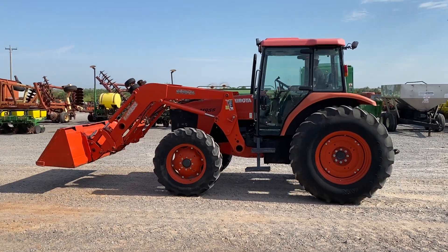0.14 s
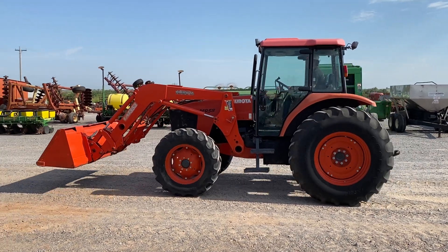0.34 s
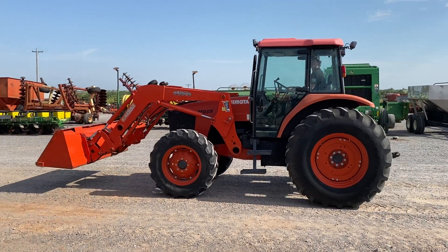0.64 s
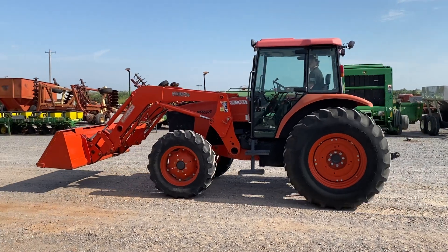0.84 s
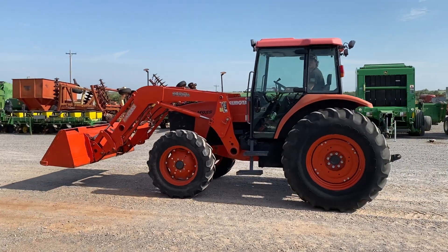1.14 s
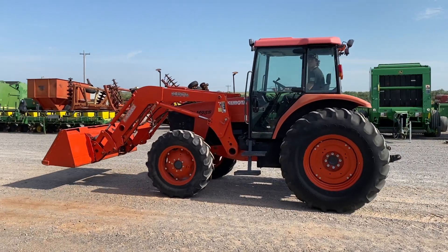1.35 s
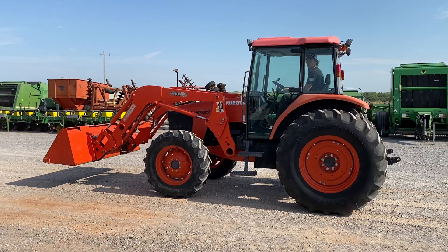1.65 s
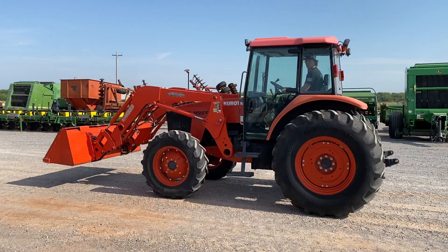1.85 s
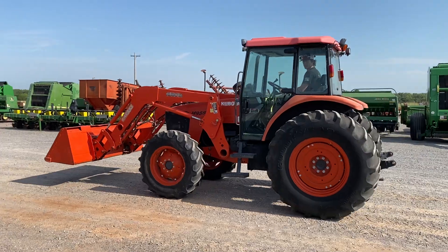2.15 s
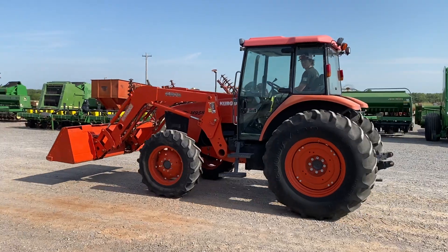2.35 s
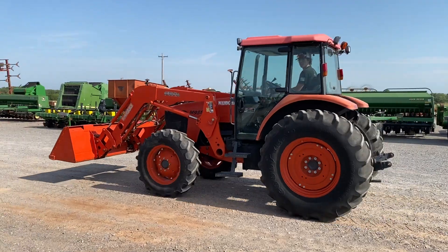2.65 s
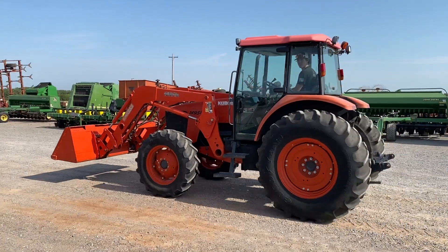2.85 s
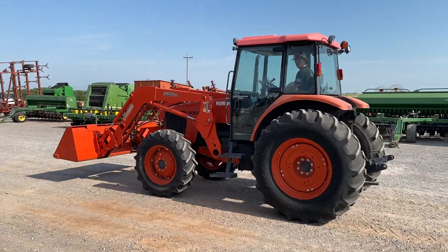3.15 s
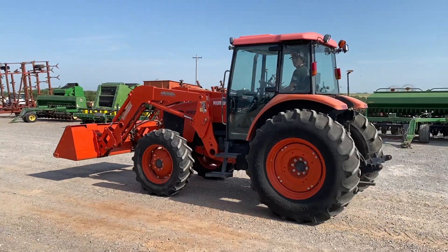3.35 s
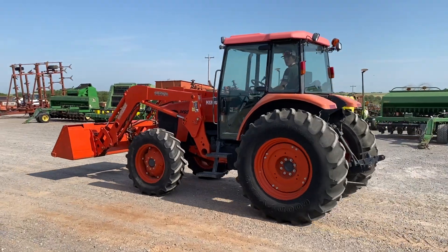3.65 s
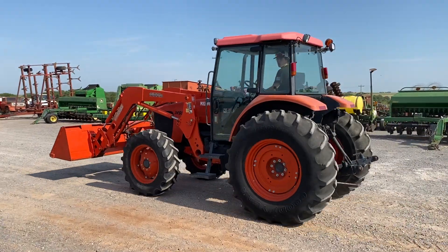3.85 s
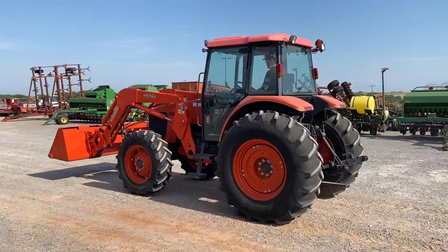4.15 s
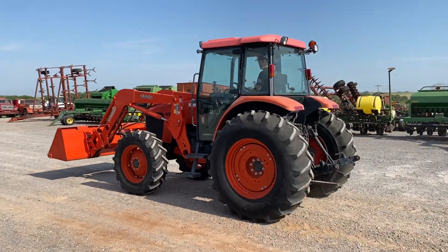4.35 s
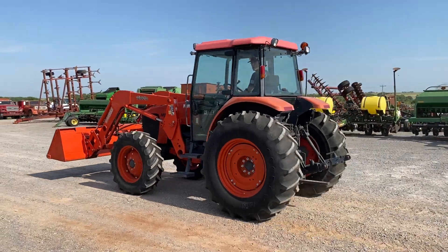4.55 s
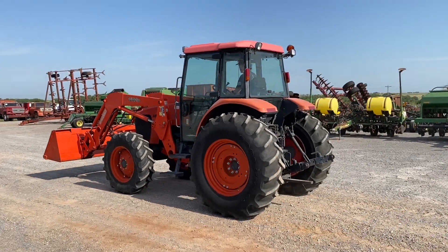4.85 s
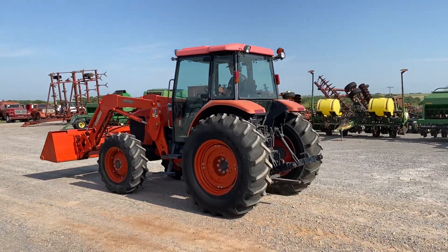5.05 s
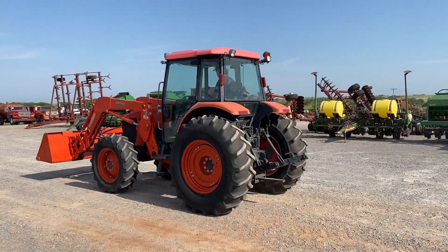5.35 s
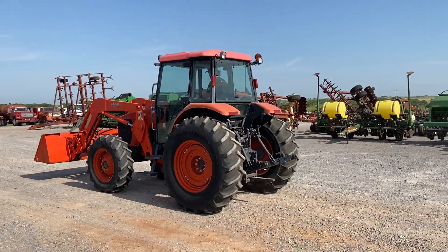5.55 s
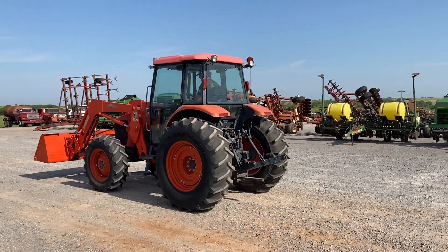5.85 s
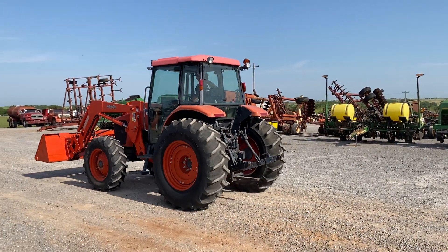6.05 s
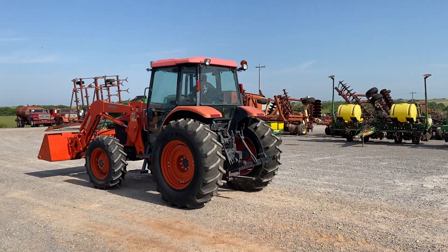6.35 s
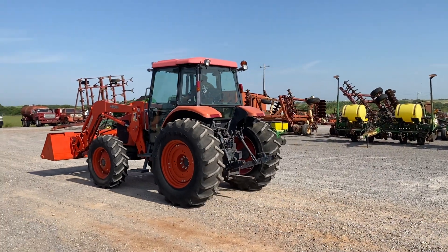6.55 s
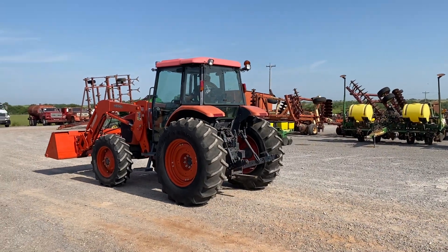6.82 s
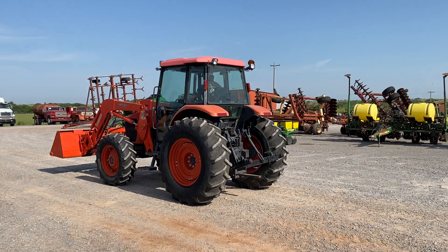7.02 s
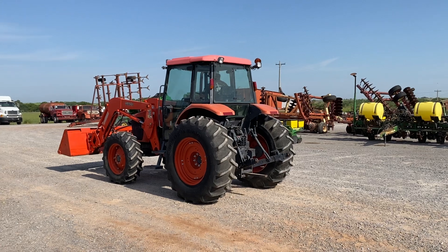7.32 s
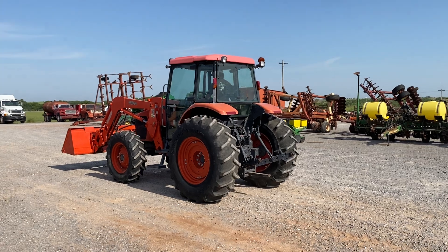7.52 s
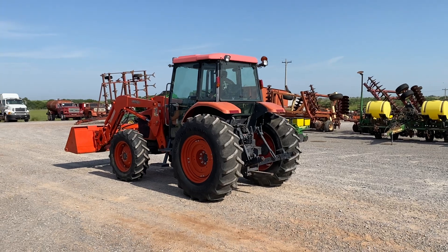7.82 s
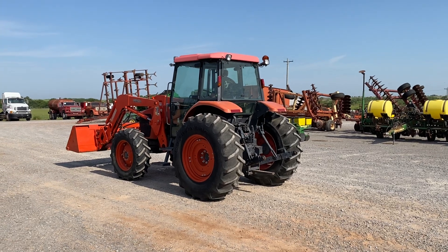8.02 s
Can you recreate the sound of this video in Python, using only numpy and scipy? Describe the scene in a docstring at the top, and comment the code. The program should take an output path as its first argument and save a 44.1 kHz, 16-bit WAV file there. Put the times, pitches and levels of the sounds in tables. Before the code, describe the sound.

A diesel tractor runs close by in an open yard, with a low pulsing exhaust, dense knocking, light ticks and a thin, fluttering gear whine. Gusty wind rumbles on the hand-held microphone, thumping at the very start and again between about 1.5 and 3 seconds. The engine knocks harder in the first half second, rises slightly in speed from 1 to 2.5 seconds, then holds steady. Scattered stones snap under the creeping tyres, with a cluster of knocks and a clank near 5.7 seconds. From about 5.3 to 6 seconds the engine slows to a lower beat and then grows quieter as it draws away. Around 6.6 seconds the steel linkage rattles briefly with a hollow clunk. Strong wind thumps and pops follow from 6.7 to 7.5 seconds, then the wind eases and the softer engine continues until about 8 seconds.

```python
"""A gravel yard in gusty wind, where a diesel tractor creeps away from two hand-held microphone ports.
Each firing drives a pulse from the exhaust and shakes the casing, so exhaust beats, combustion knock,
valve ticks and gear whine all follow the engine speed, which drops near the end. Stones snap under
the tyres amid low knocks and a clank, the steel linkage rattles once, and turbulent air buffets the
ports with thumps and pops."""
import sys
import numpy as np
from scipy import signal
from scipy.fft import rfft, irfft, next_fast_len
from scipy.io import wavfile

SR = 44100
rng = np.random.default_rng(int(sys.argv[2]) if len(sys.argv) > 2 else 0)


def master_out(mix):
    """Clip the mix to full scale and print it as 16-bit PCM to the path in sys.argv[1]."""
    frames = np.transpose(np.atleast_2d(mix))
    ceiling = np.clip(frames, -1, 1)
    pcm = np.round(ceiling * 32767).astype(np.int16)
    wavfile.write(sys.argv[1], SR, pcm)


N = 360738
T = np.arange(N) / SR
HZ = np.fft.rfftfreq(N, 1 / SR)

# combustion knock as the tractor turns and draws away: (time [s], level [dB])
KNOCK_LEVEL = [(0, -29), (.8, -26.5), (2.4, -25), (3.5, -27), (4.2, -26), (5.2, -27), (5.6, -29.5),
               (6.0, -30.5), (6.7, -29.5), (7.3, -32), (7.8, -34.5), (8.18, -32.5)]


def gain_of(db):
    """Amplitude ratio of a level in decibels."""
    return 10 ** (np.asarray(db) / 20)


def unit_rms(x):
    """Normalisation to a root-mean-square value of 1."""
    return x / np.sqrt(np.mean(x ** 2) + 1e-20)


def spectrum(points, hz=HZ):
    """Interpolation of a (frequency, value) table on a logarithmic frequency axis."""
    f, value = np.transpose(points)
    return np.interp(np.log(hz + 1), np.log(f + 1), value)


def curves(rows):
    """Linear interpolation in time: one curve for each column after the first."""
    times, *columns = np.transpose(rows)
    return [np.interp(T, times, column) for column in columns]


def coloured(x, points):
    """Spectral shaping by a (frequency, level) table, normalised to rms 1."""
    return unit_rms(irfft(rfft(x) * gain_of(spectrum(points)), N))


def resonance(hz, width_hz):
    """Lorentzian peak of a damped resonator, of height 1."""
    return 1 / (1 + (2 * (HZ - hz) / width_hz) ** 2)


def mode(t, hz, db, t60):
    """Free vibration of a damped mode: a sinusoid that falls 60 dB in t60 seconds."""
    return gain_of(db - 60 * t / t60) * np.sin(2 * np.pi * hz * t)


def wander(rate_hz):
    """Slow random modulation: low-pass noise of rms 1."""
    hop = 64
    steps = next_fast_len(N // hop + 2)
    hz = np.fft.rfftfreq(steps, hop / SR)
    slow = irfft(rfft(rng.standard_normal(steps)) / (1 + (hz / rate_hz) ** 4), steps)
    return np.interp(np.arange(N) / hop, np.arange(steps), unit_rms(slow))


def firings():
    """Phase is the integral of frequency: the running count of firings."""
    # engine speed: (time [s], firing rate [Hz])
    speed = [(0, 36.7), (.75, 36.8), (1.45, 37.55), (2.5, 39.1), (2.85, 39.25), (3.2, 39.1), (4.9, 39.1),
             (5.31, 38.8), (5.47, 37.4), (5.6, 35.3), (5.75, 33.4), (5.89, 31.6), (5.98, 30.8), (6.1, 30.8),
             (6.2, 31.5), (6.3, 31.6), (6.65, 32.2), (7.35, 32.1), (8.18, 32.5)]
    return 0.082 + np.cumsum(curves(speed)[0]) / SR


def per_firing(spread_db, pattern_db):
    """Cyclic variation: each firing's strength is a repeating cylinder pattern plus chance."""
    count = firings().astype(int)
    chance = np.clip(rng.standard_normal(count[-1] + 1), -1.7, 1.7)
    return gain_of(spread_db * chance[count] + np.array(pattern_db)[count % len(pattern_db)])


def firing_decay(decay, lag=0):
    """Exponential decay restarted once a firing; decay and lag are in firing periods."""
    return np.exp(-((firings() - lag) % 1) / decay)


def harmonic(order, jitter_cycles, jitter_hz):
    """Phase modulation: a multiple of the firing rate that wavers at random, rms 1."""
    cycles = order * firings() + rng.random() + jitter_cycles * wander(jitter_hz)
    return np.sqrt(2) * np.sin(2 * np.pi * cycles)


def following_knock(db, slope):
    """Power-law gain: db when the knock is at -26 dB, moving by slope dB per dB of knock."""
    return gain_of(db + slope * (curves(KNOCK_LEVEL)[0] + 26))


def wind():
    """Turbulent pressure at the ports: a lumpy rumble out of which duller gusts rise and fade."""
    # steady flow: (time [s], level [dB], brightness [0-1])
    flow = [(0, -19.5, 0.24), (.5, -20, 0.25), (1.2, -20.5, 0.34), (1.7, -16.5, 0.17), (1.95, -16, 0.33),
            (2.15, -16, 0.41), (2.5, -17.5, 0.24), (2.9, -16.5, 0.24), (3.2, -19, 0.41), (3.8, -22, 0.24),
            (4.0, -19.5, .6), (4.35, -24, 0.6), (4.7, -22, 0.52), (5.3, -18.5, 0.5), (5.8, -23, 0.45),
            (6.5, -21, 0.56), (6.7, -15.5, 1), (6.95, -18.5, 0.47), (7.03, -23.5, 0.58), (7.12, -23, 0.8),
            (7.2, -16, 0.37), (7.3, -22, 0.16), (7.4, -19, 0.56), (7.49, -21.5, 0.74), (7.56, -29, 0.25),
            (7.8, -37.5, 0.14), (8.18, -28.5, 0.6)]
    # gusts thumping the ports: (peak time [s], level [dB], decay time [s])
    thumps = [(0.087, -3.5, 0.0078), (.13, -5, 0.036), (0.339, -16, 0.0096), (.43, -15, 0.037),
              (.7, -13, 0.055), (.93, -22, .03), (1.36, -13, 0.018), (1.43, -24, 0.015), (1.5, -12, 0.015),
              (1.82, -9, 0.031), (1.93, -22, 0.026), (2.03, -11, 0.03), (2.16, -14.5, 0.039),
              (2.28, -8, 0.054), (2.39, -5, 0.016), (2.69, -14, 0.037), (2.78, -12, 0.058),
              (2.94, -15.5, 0.033), (3.05, -19, 0.016), (4.9, -17, 0.023), (5.42, -13, 0.02),
              (6.29, -26, 0.041), (6.63, -18, 0.042), (6.72, -28, 0.041), (6.84, -20, 0.015),
              (6.979, -13.5, 0.012), (7.045, -8.5, 0.064), (7.09, -12, 0.018), (7.13, -10, 0.014),
              (7.399, -8.5, 0.023), (7.47, -13, 0.024), (7.77, -26, 0.023), (8.08, -24, .03),
              (8.16, -25, .03)]
    # turbulence at brightness 0: (frequency [Hz], relative level [dB])
    dull_spectrum = [(20, -38), (35, -13.5), (55, 5), (100, 0), (200, -11.5), (400, -54), (900, -55),
                     (2000, -85)]
    # turbulence at brightness 1: (frequency [Hz], relative level [dB])
    bright_spectrum = [(20, -46), (35, -4), (70, -4.5), (130, -7.5), (250, -6.5), (450, -11), (900, -37),
                       (2000, -65)]
    rise_s, gust_brightness = 0.015, 0.63
    flow_db, bright = curves(flow)
    gusts = np.zeros(N)
    for peak_s, db, decay_s in thumps:
        near = slice(max(round((peak_s - .1) * SR), 0), round((peak_s + .5) * SR))
        t = T[near] - peak_s
        gusts[near] += gain_of(db) * np.where(t < 0, np.exp(-(t / rise_s) ** 2), np.exp(-t / decay_s))
    steady = gain_of(flow_db + 3 * wander(rate_hz=13.8))
    bright = np.clip(bright * (steady + gust_brightness * gusts) / (steady + gusts), 0, 1)
    air = rng.standard_normal((2, N))
    turbulence = (1 - bright) * coloured(air, dull_spectrum) + bright * coloured(air, bright_spectrum)
    return np.hypot(steady, gusts) * turbulence


def eddy_pops():
    """An eddy bursting at a port is a pressure transient: a few damped cycles that sink in pitch."""
    # (time [s], level [dB], approximate starting frequency [Hz], final frequency [Hz], t60 [s])
    eddies = [(0.07, -4, 487, 76, 0.1), (1.483, -8, 300, 80, 0.24), (2.361, -6, 383, 69.4, 0.38),
              (6.719, -9.5, 475, 121, 0.18), (7.043, -7, 300, 99, 0.11), (7.126, -2, 437, 118, 0.093),
              (7.2104, 1, 660, 70.4, 0.11), (7.384, -11, 770, 79.4, 0.097), (7.776, -21, 151, 81, 0.042)]
    out, t = np.zeros(N + SR), np.arange(SR // 4) / SR
    attack = 1 - np.exp(-t / 0.0011)
    for start_s, db, first_hz, last_hz, t60 in eddies:
        cycles = (first_hz - last_hz) * 0.00439 * (1 - np.exp(-t / 0.0042)) + last_hz * t
        at = round(start_s * SR)
        out[at:at + len(t)] += gain_of(db - 60 * t / t60) * np.sin(2 * np.pi * cycles) * attack
    return out[:N]


def gravel_and_knocks():
    """Impact transients: stone snaps, low knocks and a clank ring briefly over crackling gravel."""
    # stone snaps, low knocks and a clank:
    # (time [s], crack level [dB], ring level [dB], ring frequency [Hz])
    impacts = [(0.221, -26, -25, 869), (0.5138, -26, -15, 820), (1.5743, -33, -33, 818),
               (1.9174, -36, -15, 905), (2.044, -39, -19, 676), (2.2327, -33, -30, 636),
               (2.638, -28, -19, 1600), (2.673, -39, -18, 2170), (3.2264, -22.5, -20, 776),
               (3.991, -35, -16.5, 633), (4.0509, -26, -12, 846), (4.7727, -23.5, -25, 970),
               (5.2294, -32, -12, 900), (5.324, -28, -26, 716), (5.3968, -30, -42, 657),
               (5.6495, -36, -16, 880), (5.6515, -23, -24, 1490), (5.659, -34, -24, 1710),
               (5.666, -36, -29, 1500), (5.678, -40, -34, 1300), (5.7048, -29, -17, 830),
               (5.7125, -34, -32, 900), (5.727, -34, -24, 860), (6.4855, -25, -32, 974),
               (6.5974, -43, -10.5, 700), (6.704, -38, -32, 3820), (6.826, -27.5, -19, 900),
               (6.85, -36, -16, 960), (6.993, -31, -38, 676)]
    # a crack: (frequency [Hz], relative level [dB])
    snap_spectrum = [(200, -26), (600, -5), (1500, 0), (2500, 0), (4200, -3), (6000, -10), (8000, -19),
                     (16000, -32)]
    small_per_s, small_decay_s, crack_t60 = 25, 0.0095, 0.012
    noise = coloured(rng.standard_normal((2, N)), snap_spectrum)
    small = rng.random(N) < small_per_s / SR  # small stones under the tyres
    small_db = curves(KNOCK_LEVEL)[0] - 21 + 3 * np.minimum(rng.exponential(1, N), 3)
    pole = np.exp(-1 / (small_decay_s * SR))
    out = signal.lfilter([1], [1, -pole], small * gain_of(small_db)) * noise
    t = np.arange(SR // 10) / SR
    click_gain = gain_of(spectrum(snap_spectrum, np.fft.rfftfreq(len(t), 1 / SR)))
    click = np.roll(irfft(click_gain, len(t)), 40)
    click /= click.max()
    for start_s, crack_db, ring_db, hz in impacts:
        at = slice(round(start_s * SR), round(start_s * SR) + len(t))
        crack = noise[:, at]
        onset_rms = np.sqrt(np.mean(crack[:, :SR // 500] ** 2))
        out[:, at] += gain_of(crack_db - 60 * t / crack_t60) * crack / onset_rms
        out[0, at] += gain_of(crack_db + 10) * click
        out[0, at] += np.sqrt(2) * mode(t, hz, ring_db, t60=.024)
    return out


def linkage_rattle():
    """Impact excitation: loose steel parts collide in one flurry and ring in their modes."""
    # the flurry: (time [s], relative level [dB])
    flurry = [(6.45, -39), (6.588, -27), (6.596, -20), (6.64, -22), (6.7, -26), (6.77, -28.5), (6.81, -29),
              (6.854, -26), (6.874, -39), (6.934, -33), (6.99, -54)]
    # modes of the linkage: (frequency [Hz], relative level [dB], t60 [s])
    modes = [(300, -5, 0.11), (486, -6, 0.21), (586, -13, .08), (810, -17, 0.086), (1040, 2, 0.02),
             (1580, -9, 0.038), (1840, -9, 0.043), (2450, -12, 0.046)]
    # contact noise: (frequency [Hz], relative level [dB])
    clatter_spectrum = [(200, -19), (500, 4), (1500, -1), (2800, -8), (5000, -17), (8000, -31),
                        (16000, -45)]
    blows_per_s = 1500
    active = (T > flurry[0][0]) & (T < flurry[-1][0])
    blows = (rng.random((2, N)) < blows_per_s / SR) * rng.standard_normal((2, N)) * active
    t = np.arange(SR // 5) / SR
    response = sum(mode(t, hz, db, t60) for hz, db, t60 in modes)
    ringing = unit_rms(signal.oaconvolve(blows, response[None])[:, :N])
    clatter = coloured(blows, clatter_spectrum)
    duty_gain = np.sqrt(active.mean())  # refers the rms to the flurry's own length
    return gain_of(curves(flurry)[0]) * duty_gain * (0.78 * ringing + 0.98 * clatter)


def clunk():
    """Resonance of a hollow part struck during the rattle: one low mode swells and decays."""
    start_s, rise_s = 6.606, 0.0051
    t = np.maximum(T - start_s, 0)
    return (1 - np.exp(-t / rise_s)) * mode(t, hz=285, db=-9, t60=.3)


def bodywork():
    """Narrow resonances of the bodywork hum, clearest once the tractor has turned away."""
    # (frequency [Hz], bandwidth [Hz], relative level [dB])
    resonances = [(950, 22, 0), (1450, 30, -5), (2300, 70, -9)]
    # their joint hum: (time [s], level [dB])
    level = [(0, -50), (5.5, -50), (6.9, -46), (7.3, -43), (7.6, -45), (8.18, -47)]
    response = sum(gain_of(db) * resonance(hz, width) for hz, width, db in resonances)
    envelope = gain_of(curves(level)[0] + 2.2 * wander(10))
    return envelope * unit_rms(irfft(rfft(rng.standard_normal(N)) * response, N))


def metallic_hums():
    """Gears and valve train sound engine harmonics that flutter in amplitude and phase."""
    # (time [s], level of harmonic 20 [dB], of harmonic 25 [dB], of harmonic 37 [dB])
    levels = [(0, -42, -47, -46), (.8, -44, -47, -50), (1.3, -54, -52, -56), (2.5, -56, -52, -48),
              (3.6, -56, -54, -48), (5.2, -58, -56, -54), (8.18, -62, -62, -64)]
    return sum(gain_of(db + 4.5 * wander(14)) * harmonic(order, jitter_cycles=.16, jitter_hz=14)
               for order, db in zip((20, 25, 37), curves(levels)))


def gear_whine():
    """Tooth meshing makes a fluttering tone, jolted in phase and amplitude by each firing."""
    # the mesh tone: (time [s], level [dB])
    level = [(0, -55), (.55, -47), (.72, -40), (1.0, -44), (2.0, -43), (2.4, -48), (2.7, -42), (3.18, -50),
             (3.32, -40), (3.5, -48), (4.2, -46), (4.64, -56), (4.72, -40), (5.15, -40), (5.25, -50),
             (5.42, -56), (5.47, -38), (5.58, -46), (5.7, -56), (5.76, -42), (5.9, -43.5), (6.0, -54),
             (6.12, -49), (6.18, -44), (6.3, -45), (6.4, -53), (7.2, -55), (7.35, -45), (7.55, -46),
             (7.65, -48), (7.85, -47), (7.95, -51), (8.18, -55)]
    teeth_per_firing = 54
    firing_angle = 2 * np.pi * firings()
    cycles = teeth_per_firing * firings() + .09 * np.sin(firing_angle) + .11 * wander(28)
    envelope = gain_of(curves(level)[0] + 3 * wander(30) + 3 * np.cos(firing_angle))
    return envelope * np.sqrt(2) * np.sin(2 * np.pi * cycles)


def valve_ticks():
    """Brief impacts radiate treble: valves and injectors tick twice a firing over a thin hiss."""
    # the ticking: (time [s], level [dB])
    level = [(0, -48.5), (.7, -49.5), (1.9, -57.5), (2.8, -53.5), (4.2, -54), (5.4, -51.5), (6.0, -55),
             (7.2, -65), (8.18, -57)]
    # a tick: (frequency [Hz], relative level [dB])
    tick_spectrum = [(3000, -6), (5000, 2), (7000, -1.5), (9000, -7), (12000, -6.5), (16000, -11.5)]
    strong = 2.2 * per_firing(2.5, [0, 1, -1, 0]) * firing_decay(.1)
    weak = 0.55 * per_firing(5, [0]) * firing_decay(.16, lag=-.33)
    drive = (.5 + strong + weak) * rng.standard_normal((2, N)) * gain_of(1.2 * wander(12))
    return gain_of(curves(level)[0]) * coloured(drive, tick_spectrum)


def shadowing():
    """Acoustic shadow: the block fades behind the cab as the tractor turns, while the covers stay."""
    # relative to the knock: (time [s], block level [dB], covers level [dB], pings level [dB])
    facing = [(0, 2.5, 2, 2.5), (1.0, -0.5, -1, 3), (2.2, -0.5, 0.5, 2), (3.5, 1, 1, 3), (5.3, 0, 1, -2),
              (6.0, -2, 1, -2), (7.0, -1.5, 2, -10), (8.18, -2.5, 2, -1)]
    return curves(facing)


def pings():
    """Free vibration of brackets and valve gear at scattered pitches, densest just after a firing."""
    pitches, base_rate_hz = np.geomspace(2500, 5044, num=48), 900
    rate_hz = base_rate_hz * (0.68 + 1.7 * firing_decay(.38))
    strikes = (rng.random(N) < rate_hz / SR) * gain_of(2 * np.minimum(rng.exponential(1, N), 3))
    struck_part = rng.integers(0, len(pitches), N)
    out, t = np.zeros((2, N)), np.arange(SR // 50) / SR
    attack = 1 - np.exp(-t / .0004)
    for part, hz in enumerate(pitches):
        ping = attack * mode(t, hz * rng.uniform(.99, 1.01), db=0, t60=.026) * 3000 / hz
        ringing = signal.oaconvolve(strikes * (struck_part == part), ping)[:N]
        out += ringing * rng.choice([-1, 1], (2, 1))
    _, _, facing_db = shadowing()
    return gain_of(curves(KNOCK_LEVEL)[0] - 17.5 + facing_db + 2.16 * wander(6.3)) * unit_rms(out)


def side_panel():
    """Forced vibration: a thin cover rattles in one band, harder at every second firing."""
    # response of the cover: (frequency [Hz], relative level [dB])
    response = [(1100, -13), (1330, -7.5), (1370, 4.5), (1410, -0.5), (1443, 5.5), (1480, 1.5),
                (1540, -0.5), (1600, 1), (1800, -32.5)]
    shake = 0.7 + per_firing(4, [-4, 3]) * firing_decay(.5, lag=.1)
    return following_knock(-34.5, slope=1.5) * coloured(shake * rng.standard_normal((2, N)), response)


def hard_knock():
    """Impulse response: each firing's pressure jump rings the casing, one cylinder in four harder."""
    # modes of the casing: (frequency [Hz], relative level [dB], t60 [s])
    modes = [(720, 2, 0.014), (930, 5, 0.025), (1443, -2, 0.045), (2090, -9, 0.031), (4430, -13.5, 0.013)]
    # extra strength of that cylinder: (time [s], level [dB])
    imbalance = [(0, 25), (.38, 23), (.45, 4), (8.18, 3)]
    count = firings().astype(int)
    blows = np.diff(count, prepend=0) * per_firing(0.95, [1, 0.5, 0, 0.81])
    blows *= gain_of(curves(imbalance)[0] * (count % 4 == 1))
    t = np.arange(SR // 20) / SR
    response = sum(mode(t, hz, db, t60) for hz, db, t60 in modes) * (1 - np.exp(-t / .001))
    response *= np.sqrt(SR / 40) / np.linalg.norm(response)  # rms near 1 at 40 unit blows a second
    return following_knock(-43, slope=5) * signal.oaconvolve(blows, response)[:N]


def exhaust():
    """Periodic gas pulses form a harmonic series on the firing rate; each partial wavers a little."""
    # exhaust beats: (time [s], level of harmonic 2 [dB], of harmonic 4 [dB], of harmonic 5 [dB])
    beats = [(0, -23.5, -35, -56), (2.6, -26, -37, -36), (3.8, -21, -32.5, -35.5), (4.4, -20.5, -33, -31),
             (4.7, -28, -35, -38), (5.1, -22.5, -33.5, -30), (5.6, -28.5, -43, -32),
             (5.9, -28.5, -29.5, -36), (6.1, -39, -40, -40), (6.5, -43, -28, -58), (7.5, -37, -41.5, -46),
             (8.18, -54, -33.5, -44)]
    # weaker partials: (harmonic number, level relative to the knock [dB])
    weak_partials = [(1, -12), (3, -11), (9, -16), (15, -24), (18, -29), (22, -25), (29, -26), (36, -25)]
    partials = list(zip((2, 4, 5), curves(beats)))
    partials += [(order, db + curves(KNOCK_LEVEL)[0]) for order, db in weak_partials]
    out = 0
    for order, db in partials:
        unrest = min(order, 6)  # higher partials waver more
        envelope = gain_of(db + (1.5 + 0.38 * unrest) * wander(5.1))
        out += envelope * harmonic(order, jitter_cycles=0.015 * unrest, jitter_hz=9)
    return out


def combustion_knock():
    """Source and filter: a noise burst at each firing, over a steady churn, resonates in the casing."""
    # broad colour of the knock: (frequency [Hz], relative level [dB])
    knock_spectrum = [(90, -34), (150, -33), (200, -7), (500, -9), (830, -7.5), (1150, -14.5),
                      (1450, -18.5), (1800, -18), (2400, -20), (3400, -25), (4800, -27.5), (5400, -32.5),
                      (7500, -35.5), (10000, -44), (16000, -82)]
    # casing resonances: (frequency [Hz], bandwidth [Hz], gain [dB])
    panels = [(665, 150, 0), (892, 640, 4.5), (930, 140, 3), (2140, 510, 4.5), (3460, 130, 2.5),
              (4780, 420, 1.5)]
    peaks = sum((gain_of(db) - 1) * resonance(hz, width) for hz, width, db in panels)
    colour = gain_of(spectrum(knock_spectrum)) * abs(1 + peaks)
    crossover_hz = 1700  # the heavy block sounds below, the light covers above
    low_share = 1 / (1 + (HZ / crossover_hz) ** 6)
    block_db, covers_db, _ = shadowing()
    out = 0
    for share, lag, churn, db in (low_share, 0, 1.9, block_db), (1 - low_share, .2, 1.4, covers_db):
        burst = churn + per_firing(2.2, [-1, 1.2, -1, .8]) * firing_decay(.25, lag)
        repeating = rng.standard_normal(1200)[(firings() % 1 * 1200).astype(int)]  # alike each firing
        noise = rng.standard_normal((2, N)) + 0.24 * repeating
        drive = unit_rms(burst) * noise * gain_of(db + .5 * wander(22))
        out += irfft(rfft(drive) * np.sqrt(share) * colour, N)
    return gain_of(curves(KNOCK_LEVEL)[0]) * unit_rms(out)


def stereo_image(diffuse, direct):
    """Partial coherence: the channels share all direct and some diffuse sound, offset in phase."""
    # left-right likeness of the diffuse sound: (frequency [Hz], coherence [0-1])
    likeness = [(60, 0.91), (140, 0.86), (340, 0.67), (860, 0.7), (1380, 0.71), (1900, 0.49), (2900, 0.68),
                (4000, 0.86), (5000, 0.26), (5500, 0.12), (6500, 0.7), (7600, 0.36), (8600, 1), (16000, 1)]
    # stereo phase offset; the treble alternates between in-phase and opposite-phase bands,
    # widening the hiss and ticks: (frequency [Hz], phase [rad])
    phase_offset = [(0, 0), (860, .15), (1900, -.3), (2900, .8), (5000, .9), (6000, 0), (7100, 0),
                    (8500, -3.1), (9500, -3.2), (10500, -6.25), (11800, -6.35), (12600, -9.4),
                    (13800, -9.5), (14700, -12.55), (16000, -12.6)]
    # left minus right: (frequency [Hz], level [dB])
    balance = [(60, 0.4), (340, 1.1), (860, 1.5), (1400, 0.5), (2400, -1), (3500, 0.5), (4600, 1.5),
               (6300, -1), (8000, 1.3), (16000, 1)]
    (common, independent), coherent = rfft(diffuse), rfft(direct)
    coherence, lean = spectrum(likeness), gain_of(spectrum(balance) / 2)
    offset_rad = np.interp(HZ, *np.transpose(phase_offset))
    left = common + coherent
    right = coherence * common + np.sqrt(1 - coherence ** 2) * independent + coherent
    return irfft(np.array([left * lean, right * np.exp(-1j * offset_rad) / lean]), N)


def scene():
    """Superposition of tractor, gravel and wind in two channels."""
    diffuse = combustion_knock() + side_panel() + pings() + valve_ticks()
    diffuse += gravel_and_knocks() + linkage_rattle() + wind()
    direct = exhaust() + metallic_hums() + hard_knock() + gear_whine()
    direct += clunk() + eddy_pops() + bodywork()
    return stereo_image(diffuse, direct)


def record(dry):
    """Soft saturation rounds the strongest gusts; a low-pass filter then limits the band."""
    saturated = 0.91 * np.tanh(dry)
    low_pass = signal.firwin(511, cutoff=15800, window=("kaiser", 9), fs=SR)
    return signal.oaconvolve(saturated, low_pass[None], "same")


dry = scene()
out = record(dry)
master_out(out)
```